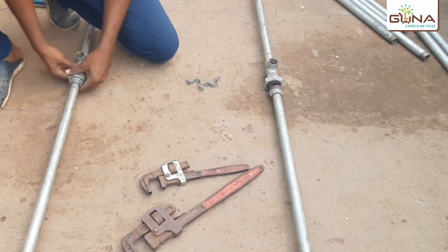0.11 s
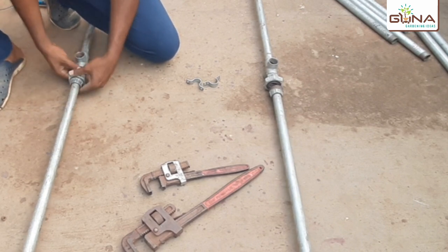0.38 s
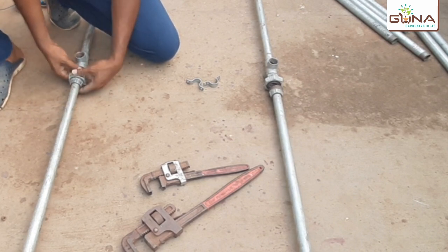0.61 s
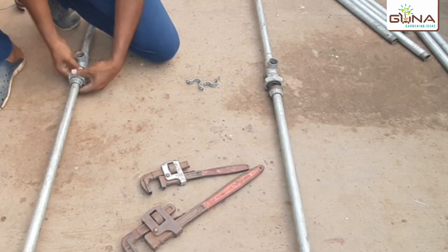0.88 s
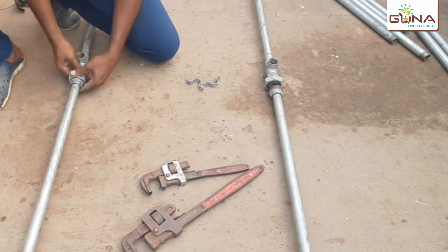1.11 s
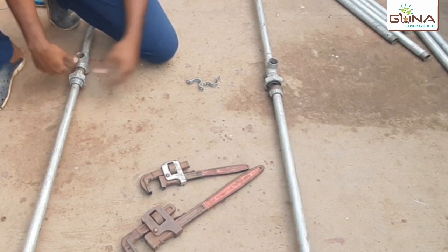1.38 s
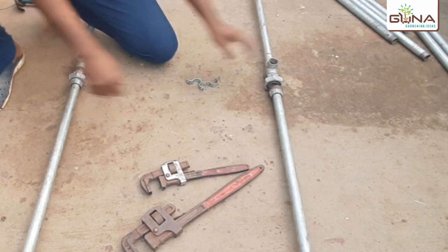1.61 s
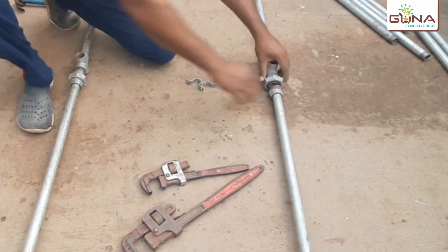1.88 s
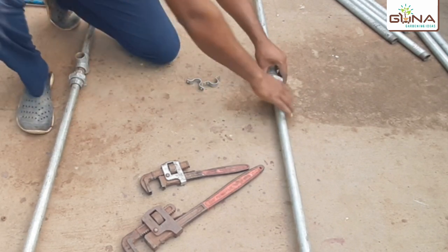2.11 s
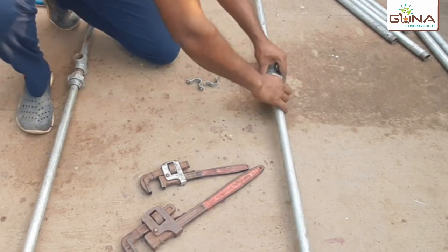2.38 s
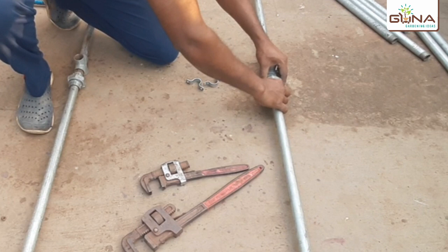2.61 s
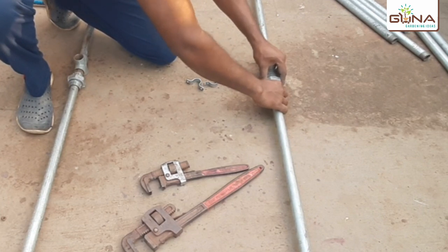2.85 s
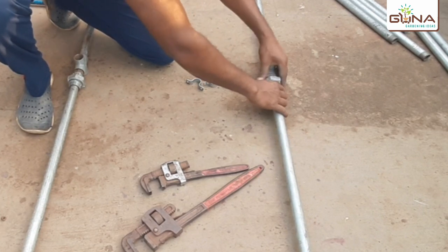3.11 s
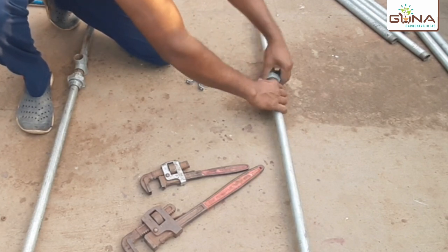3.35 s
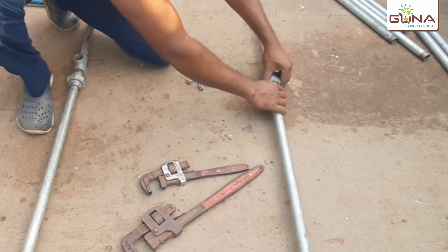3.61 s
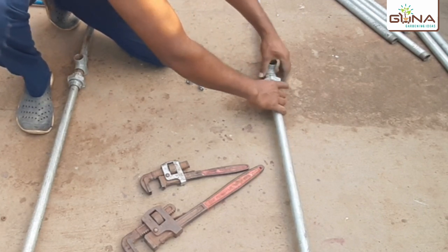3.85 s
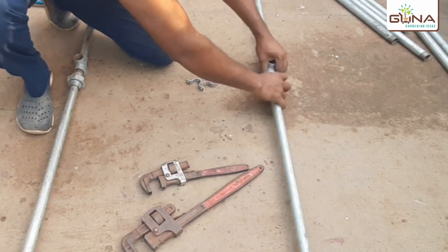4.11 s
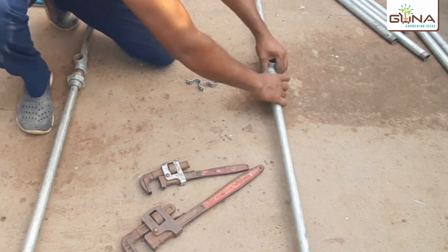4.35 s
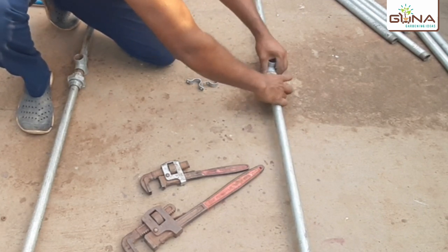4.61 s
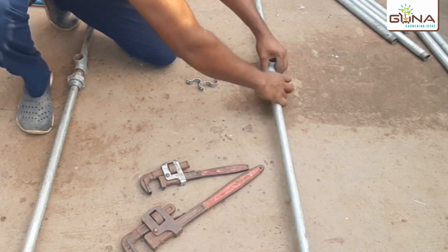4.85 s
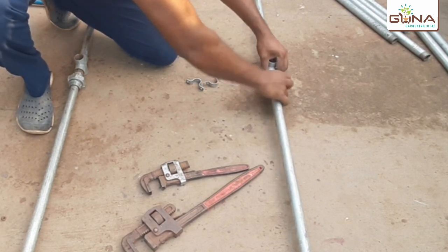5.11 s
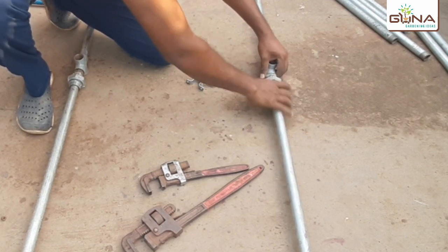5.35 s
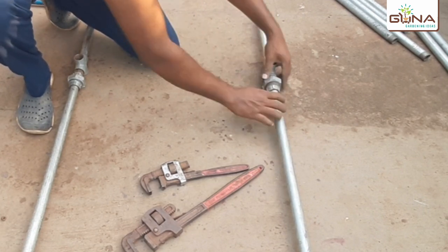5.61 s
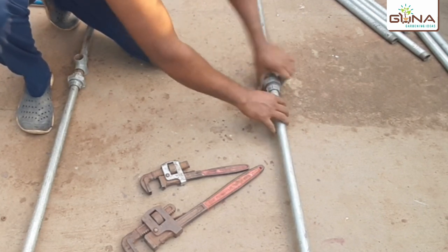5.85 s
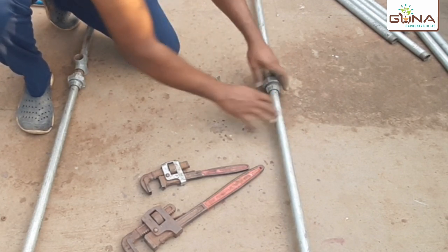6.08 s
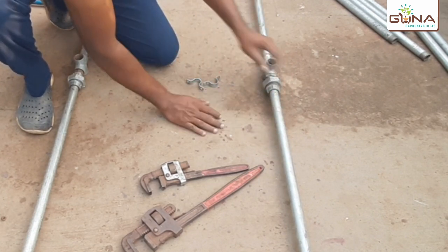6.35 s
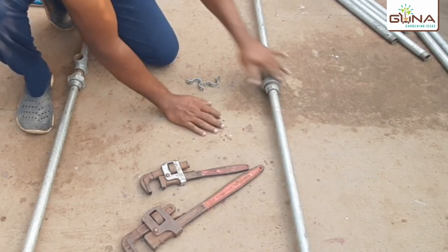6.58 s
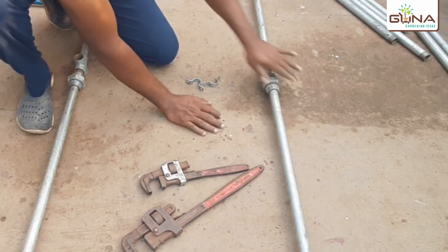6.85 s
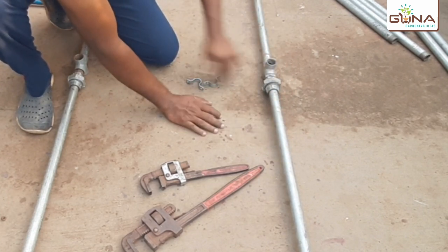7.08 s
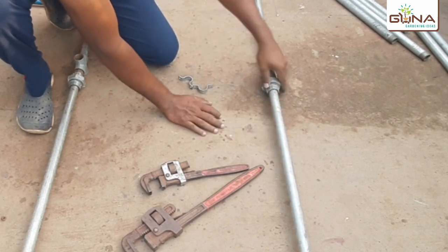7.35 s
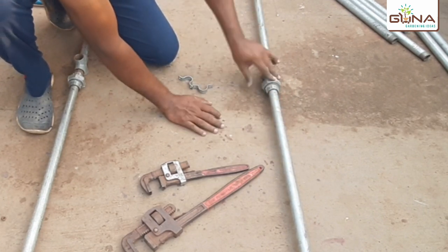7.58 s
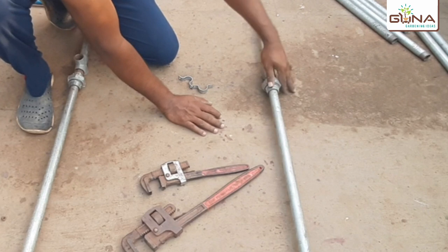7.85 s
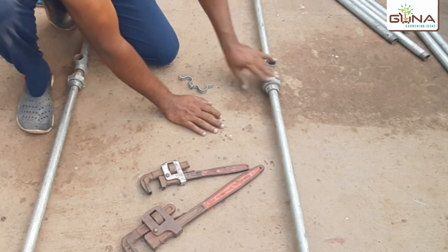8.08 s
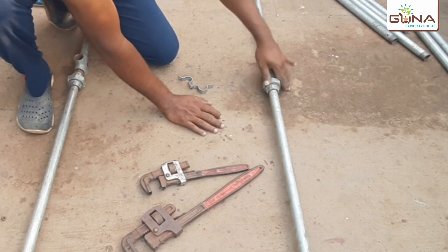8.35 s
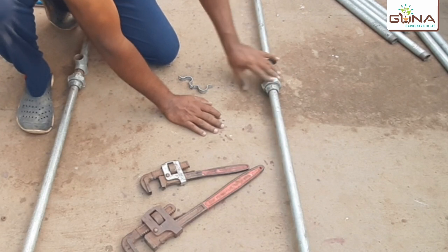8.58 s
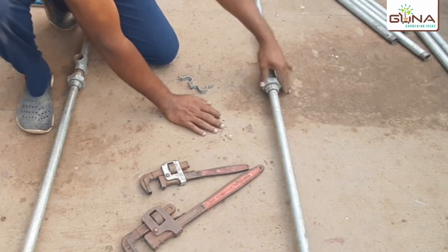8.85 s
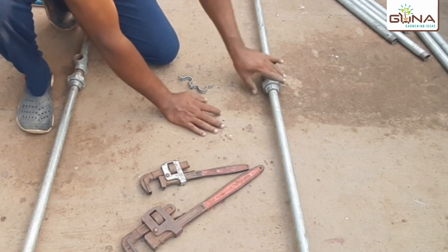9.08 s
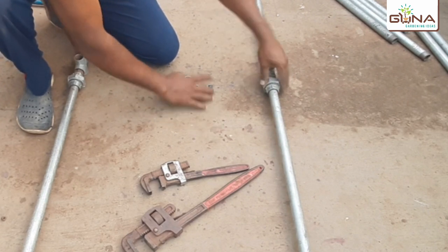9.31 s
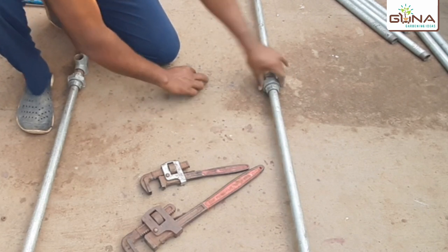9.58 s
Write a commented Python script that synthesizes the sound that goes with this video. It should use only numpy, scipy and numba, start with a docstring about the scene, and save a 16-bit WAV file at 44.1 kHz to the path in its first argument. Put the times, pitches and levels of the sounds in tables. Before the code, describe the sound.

Over faint wind and insect song, metal threads knock and grind on a hollow pipe, growing busier, brighter and more ringing, with brief squeals.

```python
"""A concrete terrace, where hands screw a steel fitting onto a long pipe lying on the slab.
Knocks and grinding of the threads are noisy forces that excite the pipe's many decaying modes; a loose nut
rings as damped sines. Gliding, fluttering sines give the hoots, squeaks, squeals and sliding fingers.
A far insect is resonated noise; light wind and distant town hiss are shaped noise, with faint far tones."""
import sys
import numpy as np
from scipy import signal
from scipy.fft import rfft, irfft, next_fast_len
from scipy.io import wavfile
from scipy.ndimage import uniform_filter1d
from numba import njit

SR = 44100
rng = np.random.default_rng(int(sys.argv[2]) if len(sys.argv) > 2 else 0)


def convert_level_to_amplitude(level_db):
    """Map a level in decibels to its linear amplitude factor."""
    exponent = np.asarray(level_db, float) / 20
    return 10 ** exponent


def store_pcm(level_fs):
    """Save levels as 16-bit WAV."""
    pcm = np.round(np.clip(level_fs, -1, 1) * 32767).astype(np.int16)
    wavfile.write(sys.argv[1], SR, np.atleast_2d(pcm).T)


N = 427769


def evened(x):
    """Normalisation: scales a signal to rms 1."""
    return x / np.sqrt(np.mean(x ** 2) + 1e-20)


def spectrum_db(points, hz):
    """Spectral interpolation: reads a curve on a log-frequency axis."""
    f, value = np.transpose(points)
    return np.interp(np.log(hz + 1), np.log(f + 1), value)


def add(mix, s, sound):
    """Superposition: mixes a sound in at time s, cut at the end of the mix."""
    part = mix[..., round(s * SR):][..., :sound.shape[-1]]
    part += sound[..., :part.shape[-1]]


def coloured(x, db_at):
    """Linear filtering: multiplies the spectrum of x by a gain curve in dB."""
    size = next_fast_len(len(x))
    gain = convert_level_to_amplitude(db_at(np.fft.rfftfreq(size, 1 / SR)))
    return irfft(rfft(x, size) * gain, size)[:len(x)]


def resonate(x, hz, width):
    """Resonance: a rotating, decaying pole that passes noise at unchanged power."""
    r = np.exp(-np.pi * width / SR)
    pole = signal.lfilter([np.sqrt(2 * (1 - r * r))], [1, -r * np.exp(2j * np.pi * hz / SR)], x)
    return pole.real


def smooth_noise(count, span):
    """Slow random fluctuation: white noise averaged twice over span samples."""
    return uniform_filter1d(uniform_filter1d(rng.standard_normal(count), span), span)


def swell_db(t, on, off, rise_db_per_s, fall_db_per_s):
    """Exponential growth and decay, in dB: climbs until on, holds, drops after off."""
    return -rise_db_per_s * np.maximum(on - t, 0) - fall_db_per_s * np.maximum(t - off, 0)


def air():
    """Broadband turbulence: steady town hiss, and wind whose level is lumpy, share one spectrum."""
    # spectrum of the open air: (frequency_hz, density_db)
    air_spectrum = [(15, -29.5), (25, 0.5), (71, 0.5), (193, -4.5), (400, -8.5), (615, -10), (946, -14.5),
                    (1310, -16.5), (1580, -18), (3440, -23.5), (4050, -25.5), (7120, -24), (8370, -21.5),
                    (15500, -32.5)]
    # levels before the small trim and the lumps: (time_s, town_hiss_db, wind_db)
    air_levels = [(0, -65.5, -60.5), (.35, -66, -68.5), (1.698, -67, -65), (2.5, -70, -68),
                  (4.502, -68, -74), (5.6, -70.5, -70), (7.299, -68.5, -70), (8.499, -72, -69.5),
                  (9.7, -73.5, -70)]
    t = np.arange(N) / SR
    s, hiss_db, wind_db = np.transpose(air_levels)

    def wind_share_db(hz):
        return -10 * np.log10(1 + (hz / 220) ** 4)

    def hiss_share_db(hz):
        return 10 * np.log10(1 - convert_level_to_amplitude(2 * wind_share_db(hz)) + 1e-9)

    hiss = coloured(rng.standard_normal(N), lambda hz: spectrum_db(air_spectrum, hz) + hiss_share_db(hz))
    wind = coloured(rng.standard_normal(N), lambda hz: spectrum_db(air_spectrum, hz) + wind_share_db(hz))
    lumps = evened(smooth_noise(N, 2500))
    hiss = evened(hiss) * convert_level_to_amplitude(np.interp(t, s, hiss_db) - 0.5)
    return hiss + evened(wind) * convert_level_to_amplitude(np.interp(t, s, wind_db) + 1.4 * lumps)


def far_tones():
    """Steady sinusoids, each blurred by narrow-band noise at its own frequency."""
    # distant steady tones: (pitch_hz, level_db)
    horn_tones = [(441.4, -78.5), (500.6, -77), (565.2, -91), (624.5, -80)]
    # their common level change: (time_s, gain_db)
    horn_swell = [(0, -3), (.35, 6), (.95, -2), (1.6, 0), (1.9, -8)]
    # one more far tone: (start_s, end_s, pitch_hz, level_db)
    on, off, late_hz, late_db = (3, 3.5, 464.5, -79)
    t = np.arange(N) / SR
    noise = rng.standard_normal(N)
    horn = np.zeros(N)
    for hz, db in horn_tones:
        horn += convert_level_to_amplitude(db) * (np.sin(2 * np.pi * hz * t) + 0.4 * resonate(noise, hz, 6.0))
    late = np.sin(2 * np.pi * late_hz * t) + 0.44 * resonate(noise, late_hz, 5.0)
    late *= convert_level_to_amplitude(late_db + swell_db(t, on, off, 150, 150))
    return late + horn * convert_level_to_amplitude(np.interp(t, *np.transpose(horn_swell), right=-80))


def insect():
    """Resonant radiation: one noise through several resonances makes the song's fuzzy bands."""
    # bands of the song, from low to high after the thin main band: (frequency_hz, width_hz, level_db)
    song_bands = [(3795, 50, 7.5), (3566, 100, -2), (4370, 900, -4.5), (5900, 150, -14), (7200, 250, -8.5),
                  (8300, 300, -11.5)]
    # two phrases, before the flutter: (time_s, level_db)
    song_levels = [(0, -67), (1.1, -72), (1.64, -68), (1.8, -90), (2.3, -87), (2.45, -67.5), (3.3, -71.5),
                   (3.65, -63.5), (3.9, -77), (4.2, -100)]
    second_phrase_s, main_band_drop_db = 2.1, -6.0  # the main band is weaker in the second phrase
    t = np.arange(N) / SR
    noise = rng.standard_normal(N)
    song = sum(convert_level_to_amplitude(db) * resonate(noise, hz, width) for hz, width, db in song_bands[1:])
    hz, width, db = song_bands[0]
    song += convert_level_to_amplitude(db + main_band_drop_db * (t > second_phrase_s)) * resonate(noise, hz, width)
    flutter_db = 1.5 * evened(uniform_filter1d(rng.standard_normal(N), 5000))
    return evened(song) * convert_level_to_amplitude(np.interp(t, *np.transpose(song_levels), right=-120) + flutter_db)


def buffet():
    """Turbulence on the microphone: a puff of wind is a low lump with a duller roar above."""
    puff_s, hold_s, low_db, upper_db = 1.2803, 0.018, -30, -46
    t = np.arange(-.12, .12, 1 / SR)
    db = swell_db(t, 0, hold_s, 548, 1107)
    low_spectrum = [(20, -11), (60, 8), (150, 0.0), (300, -9.0), (600, -58.5)]  # (frequency_hz, density_db)
    upper_spectrum = [(150, -25), (300, 3.5), (900, -10.5), (1400, -22), (3000, -45)]
    low = coloured(rng.standard_normal(len(t)), lambda hz: spectrum_db(low_spectrum, hz))
    upper = coloured(rng.standard_normal(len(t)), lambda hz: spectrum_db(upper_spectrum, hz))
    puff = evened(low) * convert_level_to_amplitude(low_db + db)
    puff += evened(upper) * convert_level_to_amplitude(upper_db + 0.4 * db)  # the roar changes less steeply
    out = np.zeros(N)
    add(out, puff_s + t[0], puff)
    return out


def thumps():
    """Heavily damped response: each dull thump is a decaying burst of low noise without ring."""
    # dull low thumps, early ones from the pipe on the slab,
    # those at 6.682 and 9.0 soft lumps of wind: (start_s, level_db)
    dull_thumps = [(1.835, -54), (2.354, -47.5), (2.795, -65), (6.682, -58), (9.0, -60)]
    # spectrum of a thump: (frequency_hz, density_db)
    thump_spectrum = [(40, -11), (70, 4.5), (150, -18.5), (280, -0.5), (500, -3.5), (900, -30.5)]
    t60_s, rise_s = 0.15, 0.006
    out, t = np.zeros(N), np.arange(SR // 6) / SR
    for s, db in dull_thumps:
        noise = rng.standard_normal(len(t))
        burst = evened(coloured(noise, lambda hz: spectrum_db(thump_spectrum, hz)))
        add(out, s, burst * convert_level_to_amplitude(db - 60 * t / t60_s) * np.clip(t / rise_s, 0, 1))
    return out


def ticks():
    """Impulsive contact: each dry fingernail tick is a sine under a bell curve about one cycle long."""
    # fingernail ticks: (centre_s, level_db)
    nail_ticks = [(5.951, -20), (7.1805, -36), (7.1895, -25), (7.2395, -35), (7.2525, -20), (7.3325, -13),
                  (7.359, -26), (7.379, -26)]
    tick_hz, bell_s = 4100, 0.00007
    out, t = np.zeros(N), np.arange(-40, 40) / SR
    for s, db in nail_ticks:
        add(out, s + t[0], convert_level_to_amplitude(db) * np.exp(-(t / bell_s) ** 2) * np.sin(2 * np.pi * tick_hz * t))
    return out


def gliding(rows, rise_db_per_s, rough, grain, octave=0):
    """Modulated sines: the faster (small grain) and deeper (rough) the level flutters, the fuzzier."""
    out = np.zeros(N)
    reach_s = 0.18  # each side of the loudest moment
    t = np.arange(-reach_s, reach_s, 1 / SR)
    for s, db, hz, glide, fade in rows:
        flutter = 1 - rough + rough * evened(smooth_noise(SR // 2, grain))[:len(t)]
        phase = 2 * np.pi * (hz * t + glide * t ** 2 / 2)
        level = convert_level_to_amplitude(db + swell_db(t, 0, 0, rise_db_per_s, fade)) * signal.windows.tukey(len(t), .3)
        add(out, s + t[0], np.sqrt(2) * (np.sin(phase) + octave * np.sin(2 * phase)) * flutter * level)
    return out


def rubs():
    """Sliding friction: fingers on the steel hiss as sines broadened by deep, fast flutter."""
    # slides: (loudest_s, level_db, pitch_hz, glide_hz_per_s, fade_db_per_s)
    slides = [(3.78, -64, 5700, -1500, 101), (3.86, -72.5, 4500, -2000, 200), (4.1, -73.5, 7400, 100, 300),
              (5.87, -63.5, 5500, 1000, 200), (6.42, -58, 5300, -2000, 99), (6.5, -64, 4900, -1000, 200),
              (6.88, -64.5, 5600, 96.5, 101), (9.23, -67.5, 8300, 505, 60), (9.45, -61.5, 4900, -4000, 700)]
    return gliding(slides, rise_db_per_s=217, rough=1, grain=28)


def squeaks():
    """Stick-slip friction: faint thin squeaks as gliding sines with moderate flutter."""
    # squeaks: (loudest_s, level_db, pitch_hz, glide_hz_per_s, fade_db_per_s)
    thin_squeaks = [(3.74, -58, 4920, 102, 150), (3.84, -55, 4900, -1800, 280),
                    (6.49, -57, 4760, -300, 290), (7.942, -67, 3990, 501, 300), (8.87, -67, 3430, 100, 200),
                    (3.76, -58, 5800, -2500, 150), (9.466, -51, 3345, -500, 350)]
    return gliding(thin_squeaks, rise_db_per_s=298, rough=.35, grain=160)


def hoots():
    """Air-column resonance: the open pipe hoots when rubbed, as nearly pure gliding sines."""
    # hoots: (loudest_s, level_db, pitch_hz, glide_hz_per_s, fade_db_per_s)
    pipe_hoots = [(3.655, -46.5, 759, -20, 155), (7.86, -56.5, 765, 126.5, 47)]
    return gliding(pipe_hoots, rise_db_per_s=604, rough=.13, grain=180)


def squeals():
    """Stick-slip oscillation: the tight thread squeals as a sine with its octave that starts abruptly."""
    # squeals, the first gliding up, the second down:
    # (loudest_s, level_db, pitch_hz, glide_hz_per_s, fade_db_per_s)
    thread_squeals = [(8.679, -29, 1979, 300, 466), (9.006, -32.5, 1963, -600, 180)]
    return gliding(thread_squeals, rise_db_per_s=2404, rough=.4, grain=120, octave=convert_level_to_amplitude(-0.7))


def nut():
    """Free vibration under damping: a loose ring's modes wobble as it spins; a finger takes them down."""
    # modes: (pitch_hz, level_db, t60_s before the blow's factor, loss_db per unit of grip)
    nut_modes = [(2516, -13.5, 0.41, 19), (3253, -18.5, 0.35, -3), (4234, -6.5, 0.17, -7),
                 (4970, -9.5, 0.25, 14), (6380, 8, 0.45, 37), (9600, -6, 0.74, 8.5), (9600, -11.5, .3, 8),
                 (10700, -30, 0.34, 2.5), (11870, 4.5, 0.26, 26.5), (14510, -21, .2, 4),
                 (14740, -23, 0.16, 11.5)]
    # blows: (start_s, level_db, tilt_db_per_octave, rise_s, t60_factor)
    blows = [(7.187, -32, 1, .002, 4.2), (7.252, -12.5, 2.5, 0.007, 0.91), (9.463, -34, 2.5, 0.0046, 0.34)]
    # firmness of the finger on the nut: (time_s, grip)
    finger_grip = [(7.33, 0.84), (7.342, 1.53), (7.44, 1.25), (7.49, 3.1), (7.8, 8), (9.4, 0.49)]
    least_loss_db = 6  # every mode loses at least this per unit of grip
    out, t = np.zeros(N), np.arange(SR // 3) / SR
    for s, blow_db, tilt_db, rise, t60_factor in blows:
        # within one ring the grip never loosens
        held = np.maximum.accumulate(np.interp(t + s, *np.transpose(finger_grip)))
        wobbles = evened(np.array([smooth_noise(len(t), 300) for _ in nut_modes]))
        for (hz, db, t60, loss_db), wobble in zip(nut_modes, wobbles):
            level_db = blow_db + db + tilt_db * np.log2(hz / 9620)
            level_db = level_db - 60 * t / (t60_factor * t60) - max(loss_db, least_loss_db) * held
            level_db += 3 * np.tanh(wobble)
            add(out, s, convert_level_to_amplitude(level_db) * np.clip(t / rise, 0, 1) * np.sin(2 * np.pi * hz * t))
    return out


def shares(hz):
    """Modal coupling: how much of the low, middle and high force reaches frequency hz."""
    # coupling curve: (frequency_hz, low_share, middle_share, high_share)
    coupling = [(1080, 0.97, 0, 0), (1840, 0.063, 0.59, 0), (3850, 0.16, 0.86, 0.22),
                (9800, 0, 0.049, 0.64)]
    f, *bands = np.transpose(coupling)
    return np.array([np.interp(np.log(hz + 1), np.log(f), band) for band in bands])


def band_gains(db, edge_db, bright_db):
    """Contact spectrum: gains of lows, middle and highs; brightness trades lows for highs."""
    return convert_level_to_amplitude([db + edge_db - 1.02 * bright_db, db, db + edge_db + 0.6787 * bright_db])


def contact(modes_hz):
    """Contact mechanics: gritty force on the steel as lows, middle, highs, and as each mode feels it."""
    # knocks of thread on thread: (start_s, level_db, brightness_db, chatter_t60_s, favoured_mode_hz)
    knocks = [(1.803, -51, 7, 0.32, 5920), (1.8315, -27, 10.5, 0.06, 3420), (2.099, -59, -16, 0.05, 2520),
              (2.301, -46, -10, 0.25, 8260), (2.352, -20.5, -5, 0.022, 2120), (2.4, -36, -6, 0.045, 1620),
              (2.569, -41.5, -12, 0.016, 3760), (2.595, -42.5, -8, 0.023, 3750),
              (2.661, -47, -11, 0.03, 1620), (2.7929, -29.5, -6.5, 0.054, 2980),
              (2.916, -49.5, -19, 0.022, 3820), (3.3247, -50.5, -15, 0.25, 1680),
              (3.372, -20.5, 5.5, 0.03, 4940), (3.387, -25.5, -1, 0.077, 1555),
              (3.508, -37.5, -7, 0.053, 8400), (3.529, -28, -2, 0.021, 5000), (3.554, -36, -9, 0.039, 4760),
              (3.624, -37.5, -3, 0.056, 1670), (3.759, -47.5, -20, 0.013, 1630),
              (3.883, -52, -15, 0.023, 1630), (4.064, -49, -8, .016, 2920), (4.143, -46, -9.5, 0.25, 1680),
              (4.1871, -27.5, 13, 0.024, 2570), (4.302, -44.5, -12.5, 0.027, 8840),
              (4.417, -47, 4, 0.025, 8600), (4.458, -54, 3, 0.033, 1580), (4.498, -30, -1, 0.023, 4970),
              (4.5393, -13, 16.5, 0.026, 4900), (4.629, -33.5, -4, 0.078, 5130),
              (4.686, -41.5, -8, 0.024, 5120), (4.7684, -50, -13, 0.04, 5460), (4.84, -43, -8, 0.17, 2720),
              (5.153, -49, -20, 0.027, 1680), (5.833, -48, -13, 0.025, 1630),
              (6.026, -30.5, -7.5, 0.081, 4900), (6.218, -30, 2, 0.038, 5300),
              (6.5821, -29, -9.5, 0.011, 5020), (6.675, -17, 3.5, 0.03, 1580),
              (6.701, -14.5, -1.5, 0.019, 2700), (6.715, -20.5, 19, 0.01, 5870),
              (6.754, -21.5, -8, .014, 5900), (7.017, -35, -10.5, 0.027, 5740),
              (7.045, -26.5, -2, 0.013, 5600), (7.185, -35, 36.5, 0.058, 10000),
              (7.535, -51, 8, 0.033, 8330), (7.574, -25.5, 1.5, 0.12, 8440), (7.631, -33, -1, 0.13, 7600),
              (7.911, -43.5, -9, 0.039, 1750), (8.053, -30.5, -2, 0.027, 2350),
              (8.175, -20.5, 15, 0.15, 9700), (8.206, -16, 9.5, 0.05, 6800), (8.308, -40, 12, 0.036, 7430),
              (8.534, -46, 4, 0.043, 5920), (8.675, -34.5, 19.5, 0.064, 5840), (8.718, -44, 5, 0.029, 5900),
              (8.922, -43.5, -11, 0.023, 2270), (9.097, -15.5, 2, 0.018, 2400),
              (9.466, -35, 28, .013, 4840)]
    # twists of the fitting: (bite_s, let_go_s, bite_level_db, end_level_db, brightness_db)
    twists = [(3.655, 3.752, -81, -79, -13), (3.805, 3.86, -83, -78, -2), (4.221, 4.228, -53, -48, -2),
              (4.384, 4.502, -74.5, -64.5, -13), (5.16, 5.22, -61, -56, -5), (5.876, 5.934, -62.5, -37, -2),
              (5.987, 6.022, -53.5, -73, -12), (6.262, 6.286, -29, -30.5, -3),
              (6.314, 6.375, -39.5, -53, -3.5), (6.622, 6.75, -35, -28, -1.5),
              (7.055, 7.112, -35, -33.5, -1), (7.209, 7.315, -57, -58.5, 21.5),
              (7.346, 7.357, -45, -51.5, -1), (7.484, 7.587, -58.5, -54, -5),
              (7.997, 8.157, -46.5, -48.5, -4.5), (8.181, 8.189, -37.5, -30.5, 9),
              (8.53, 8.641, -45.5, -56, 0), (8.682, 8.667, -56, -40, 12.5), (9.03, 9.084, -29, -36, 5.5),
              (9.274, 9.305, -69, -64, 19), (9.37, 9.45, -81, -69.5, 17.5), (9.584, 9.671, -66, -55.5, -7),
              (9.679, 9.7, -46.5, -42, 7)]
    force, felt = np.zeros((3, N)), np.zeros((N, len(modes_hz)), np.float32).T
    reach = shares(modes_hz)
    # in dB: the thread catches and slips, then single burrs
    catch_db = 4.5 * evened(uniform_filter1d(rng.standard_normal(N + SR), 250))
    catch_db += 2 * evened(uniform_filter1d(rng.standard_normal(N + SR), 70))
    for on, off, on_db, off_db, bright_db in twists:
        t = np.arange(on - .08, off + .08, 1 / SR)
        db = np.interp(t, [on, off], [on_db, off_db]) + swell_db(t, on, off, 652.5, 750.5)
        bands = band_gains(db + catch_db[(t * SR).astype(int)], -8.5, bright_db)
        add(force, t[0], bands)
        add(felt, t[0], reach.T @ bands)
    t = np.arange(SR // 8) / SR
    for s, db, bright_db, t60, spot_hz in knocks:
        rise_s = 0.00023 * convert_level_to_amplitude(-.6 * (db + 9.5))  # harder blows are sharper
        first_spike = 1 + 4.35 * np.exp(-t / 0.001)
        shape = convert_level_to_amplitude(-60 * t / t60) * first_spike * (1 - np.exp(-t / rise_s))
        bands = band_gains(db - 6.5, -9, bright_db)
        # the place struck favours a mode
        spot = convert_level_to_amplitude(15.5 * np.exp(-(np.log(modes_hz / spot_hz) / 0.07) ** 2))
        add(force, s, np.outer(bands, shape))
        add(felt, s, np.outer(bands @ reach * spot, shape))
    bump_power = convert_level_to_amplitude(3.5 * np.minimum(rng.exponential(1, N), 5)) ** 2
    bumps = np.sqrt(uniform_filter1d(bump_power, 30))
    grit = evened(bumps * rng.standard_normal(N))
    return force * grit, felt.T, grit


def swarm(count=15):
    """Modal density: a crowd of close, long-ringing wall modes spread unevenly over one band."""
    low_hz, high_hz, mean_db, mean_t60_s = 5200, 5960, -9, .75
    place, size, ring_for = rng.random((3, count))
    hz = low_hz + (high_hz - low_hz) * (np.arange(count) + place) / count
    return np.transpose([hz, mean_db + 6 * (size - .5), mean_t60_s * (.5 + ring_for)])


@njit
def ring(felt, grit, gain, turn, hold, step):
    """Modal superposition: sums decaying modes; the hand shortens their decay moment by moment."""
    out, z = np.zeros(len(grit)), np.zeros(turn.shape[1], np.complex128)
    for n in range(len(out)):
        for k in range(len(z)):
            z[k] = z[k] * turn[n // step, k] * hold[n] + felt[n, k] * grit[n] * gain[n // step, k]
            out[n] += z[k].imag
    return out


def dense_modes(force):
    """Statistical acoustics: modes too close to tell apart ring as decaying noise, convolved with the force."""
    # their spectrum: (frequency_hz, density_db)
    dense_spectrum = [(150, -61), (250, -35.5), (978, 3), (1080, -13.5), (1310, -20.5), (1640, 4),
                      (4240, -4), (5690, -5), (6420, -8), (7250, -4), (9230, -7.5), (15500, -31.5)]
    # their decay: (frequency_hz, t60_s)
    dense_decay = [(400, 0.15), (2000, 0.13), (5500, 0.16), (9000, 0.18), (14000, 0.06)]
    hz, t, z = signal.stft(rng.standard_normal((3, SR // 3)), SR, nperseg=128)
    decay_db = spectrum_db(dense_spectrum, hz)[:, None] - 60 * t / spectrum_db(dense_decay, hz)[:, None]
    z = z * convert_level_to_amplitude(decay_db) * shares(hz)[:, :, None]
    body = signal.istft(z, SR, nperseg=128)[1]
    body /= np.linalg.norm(body, axis=1, keepdims=True)
    return signal.oaconvolve(force, body, axes=1)[:, :N].sum(0)


def pipe():
    """Modal synthesis: the force rings each mode and a dense mass of weaker ones, and rasps directly."""
    # ringing of pipe and fitting, before ground and hand damp it: (pitch_hz, level_db, t60_s)
    pipe_modes = [(655, 0.5, 0.3), (828, -5, 0.065), (1073, 1, 0.2), (1525, -2, 0.3), (1630, -1, 0.28),
                  (2010, -25.5, 0.039), (2327, -4.5, 0.39), (2505, 0, 0.047), (3320, -17, 0.14),
                  (3420, -7.5, .15), (3575, -3, .17), (3700, -19.5, .15), (5470, -19.5, 0.29),
                  (4926, -5.5, 0.09), (5120, -7, 0.36), (4900, -13, 0.21), (5730, -18, .3), (5830, 0.5, .9),
                  (5690, -19.5, .45), (6060, -5.5, .9), (5660, -14.5, 0.5), (6080, -7, 0.55),
                  (5920, -4.5, 0.6), (6674, -17.5, 0.4), (6310, -9.5, 0.14), (6760, -14.5, 0.17),
                  (7120, -3, 0.06), (7340, 3, 0.17), (8200, 5, 0.066), (8890, 7, 0.27), (9360, 1.5, 0.096),
                  (11380, -36, .1), (11100, -17, 0.24), (11500, -13, 0.061)]
    # a hand round the pipe damps every mode: (time_s, added_width_hz)
    hand_damping = [(3.2, 25), (3.35, 13), (4.4, 11), (4.55, 4.8), (5.0, 4), (5.5, 10), (7.1, 9.2),
                    (8.1, 2.5), (8.7, .6), (9.15, 1.25), (9.32, 8.8)]
    # the contact heard straight through the air: (frequency_hz, gain_db)
    rasp_spectrum = [(600, -40), (2000, -4.5), (5000, -6), (11000, 4.5), (15500, -11)]
    modes_db, rasp_db, dense_db, step = -13.0, -13.5, -5.5, 1500  # step in samples
    hz, db, t60 = np.vstack([pipe_modes, swarm()]).T
    force, felt, grit = contact(hz)
    t60 = np.minimum(t60, (hz / 8500) ** 1.5)  # the ground damps the low bending modes
    r = convert_level_to_amplitude(-60 / (t60 * SR))
    added_width = np.interp(np.arange(N) / SR, *np.transpose(hand_damping))
    hold = np.exp(-np.pi * added_width / SR)
    signs = (-1) ** np.arange(len(hz))
    gain = convert_level_to_amplitude(db + modes_db) * np.sqrt(2 * (1 - r * r)) * signs
    gain = gain * convert_level_to_amplitude(3 * rng.standard_normal((N // step + 1, len(hz))))  # the contact wanders over the modes
    rocked_hz = hz * (1 + .002 * rng.standard_normal(gain.shape))  # the pipe rocks on the grit and detunes
    out = ring(felt, grit, gain, r * np.exp(2j * np.pi * rocked_hz / SR), hold, step)
    # a thin pipe radiates no bass
    out = signal.sosfilt(signal.butter(2, 600, "high", fs=SR, output="sos"), out)
    out += convert_level_to_amplitude(rasp_db) * coloured(force[2], lambda f: spectrum_db(rasp_spectrum, f))
    return out + convert_level_to_amplitude(dense_db) * dense_modes(force)


def terrace(x):
    """Diffuse reflection: floor and low walls throw back a short scattered tail."""
    t60_s, echo_db = 0.32, -24.0
    t = np.arange(SR // 4) / SR
    tail = rng.standard_normal(len(t)) * convert_level_to_amplitude(-60 * t / t60_s) * (t > .002)
    return x + convert_level_to_amplitude(echo_db) * signal.oaconvolve(x, tail / np.linalg.norm(tail))[:N]


def scene():
    """Superposition of all sources at one microphone; only the ringing and rubbing is echoed."""
    background = air() + far_tones() + insect() + buffet()
    friction = rubs() + squeaks() + hoots() + squeals()
    handled = terrace(friction + nut() + pipe())
    return (background + thumps() + ticks() + handled)[None]


def band_limit(x):
    """A steep low-pass at the top of the band."""
    return signal.sosfilt(signal.butter(12, 15690, fs=SR, output="sos"), x)


def record(dry):
    """Band limiting: the microphone's bass cut at 42 Hz and a treble limit at 15650 Hz."""
    cut = signal.sosfilt(signal.butter(4, 42, "high", fs=SR, output="sos"), dry)
    cut = signal.oaconvolve(cut, signal.firwin(255, 15650, fs=SR)[None], "same")
    return band_limit(cut)


dry = scene()
out = record(dry)
store_pcm(out)
```